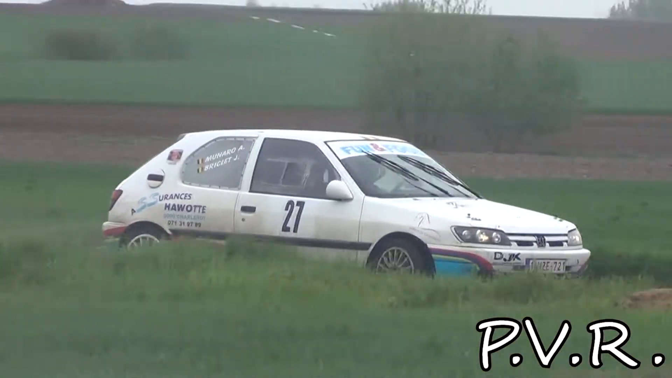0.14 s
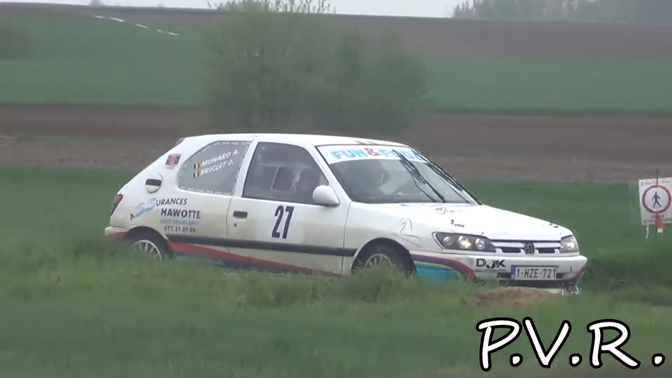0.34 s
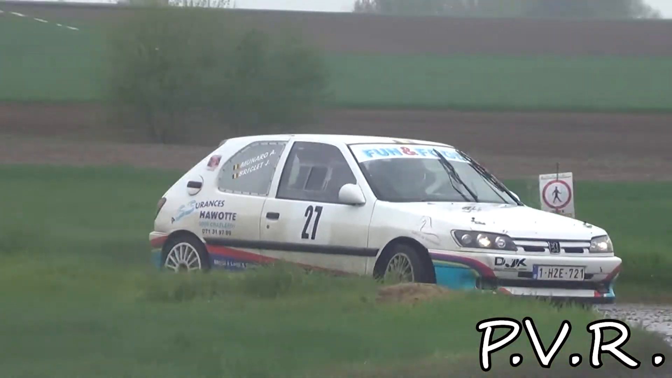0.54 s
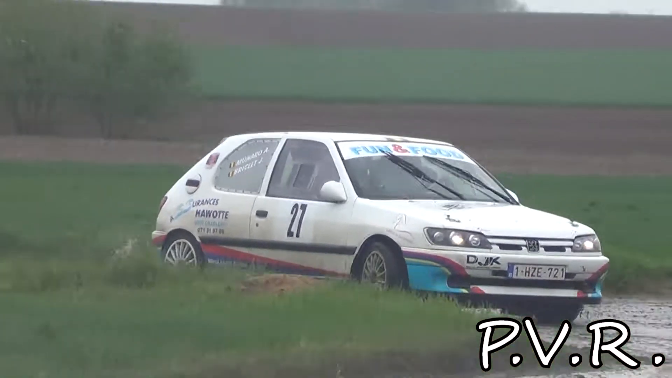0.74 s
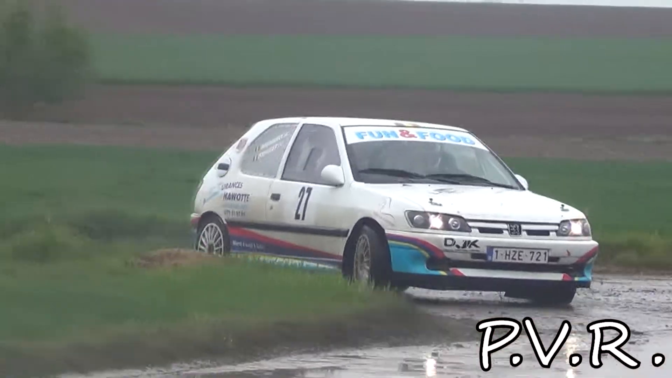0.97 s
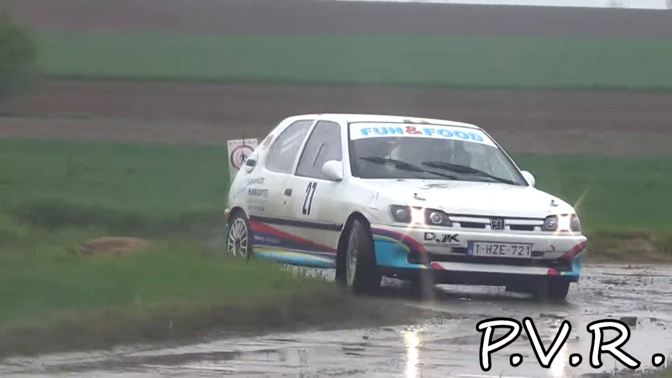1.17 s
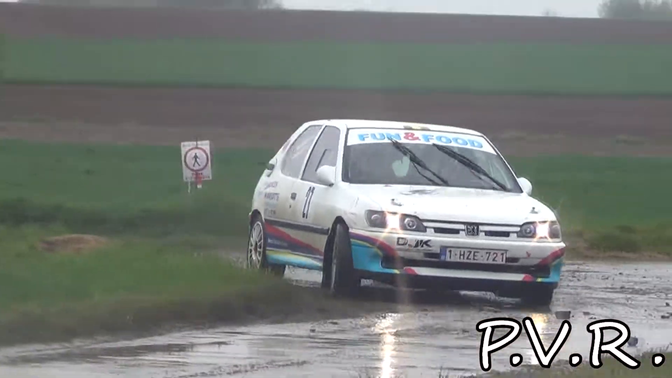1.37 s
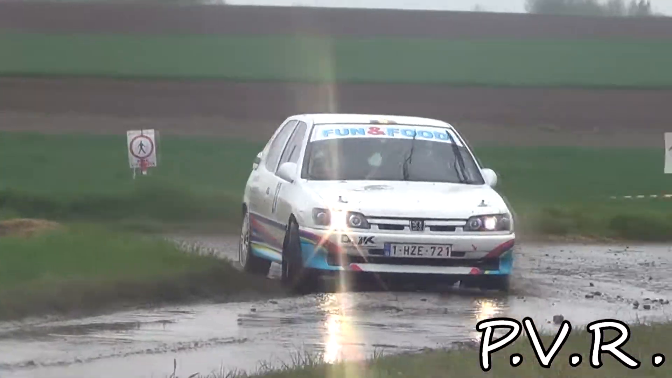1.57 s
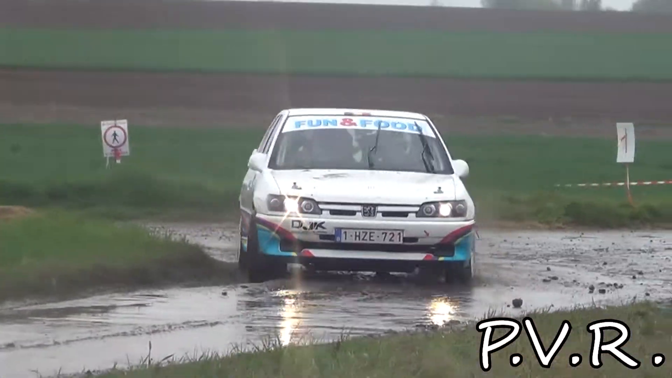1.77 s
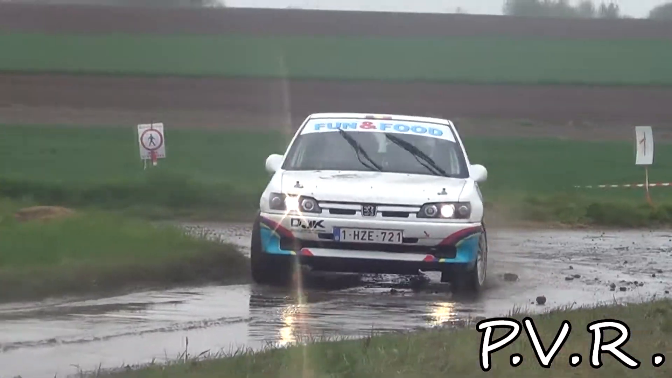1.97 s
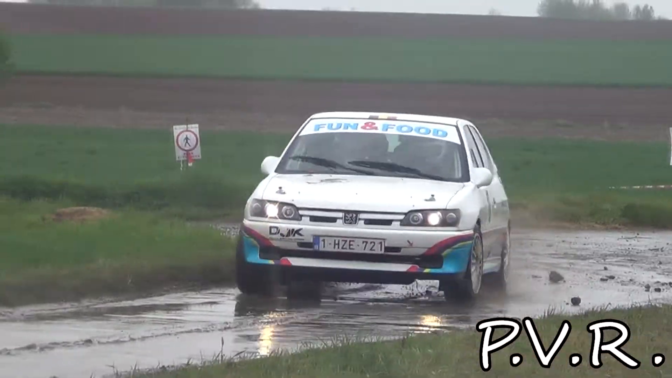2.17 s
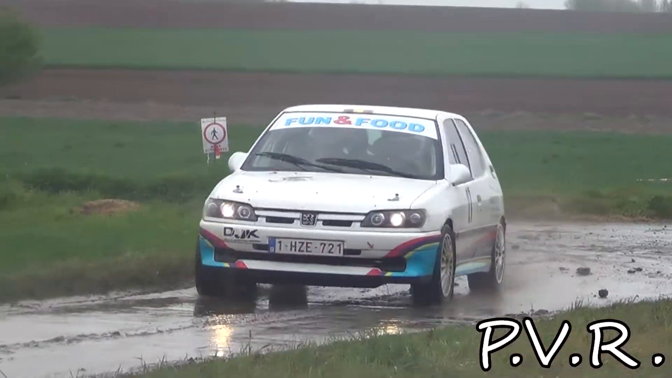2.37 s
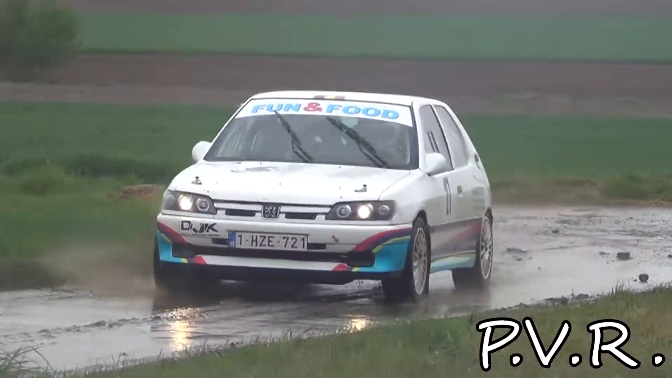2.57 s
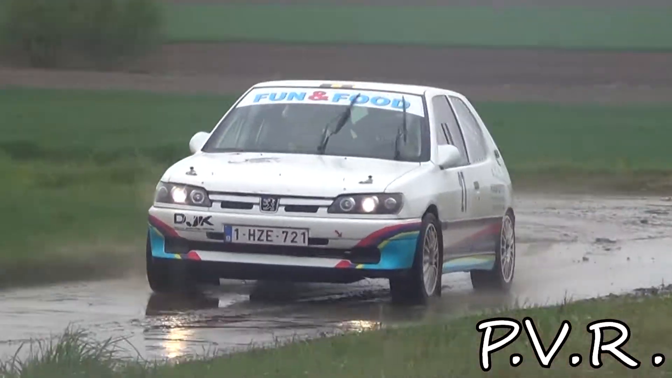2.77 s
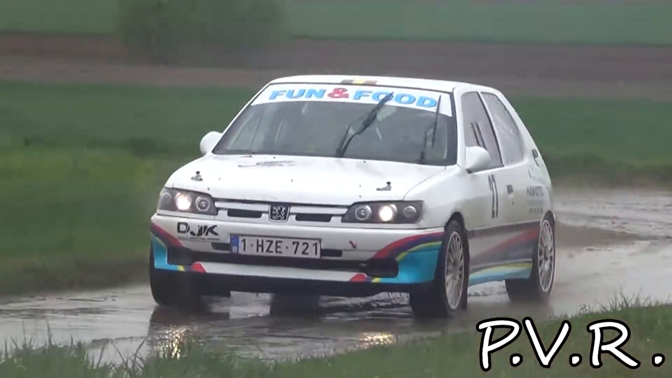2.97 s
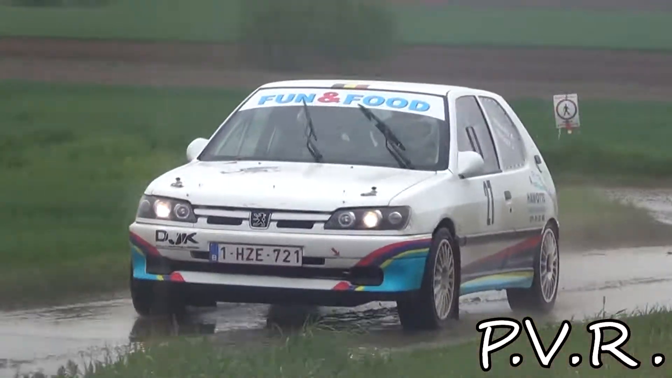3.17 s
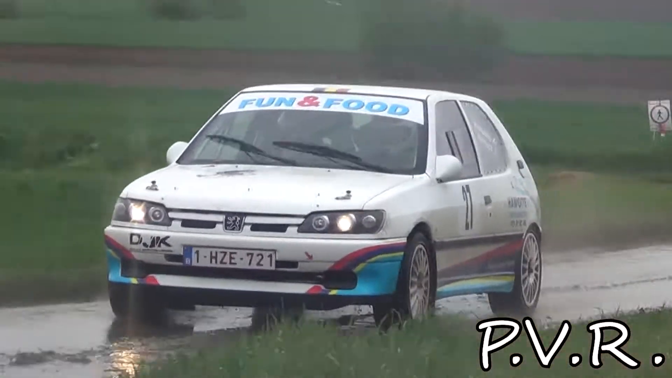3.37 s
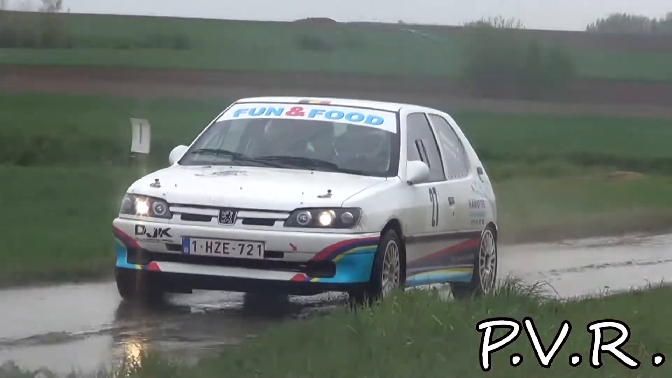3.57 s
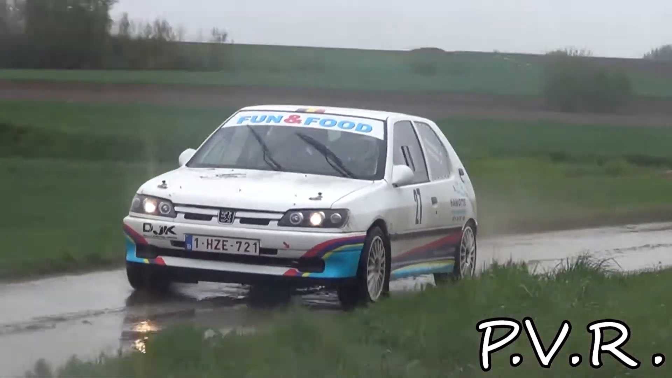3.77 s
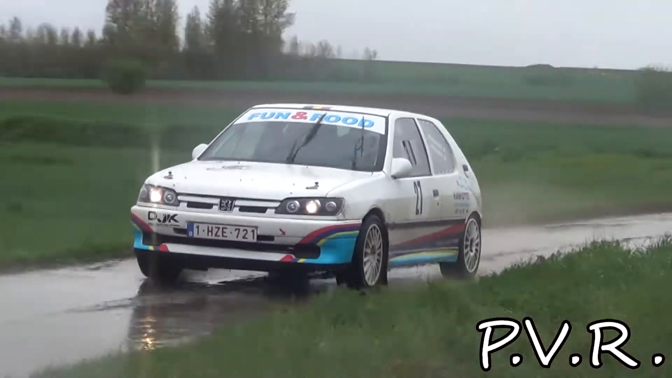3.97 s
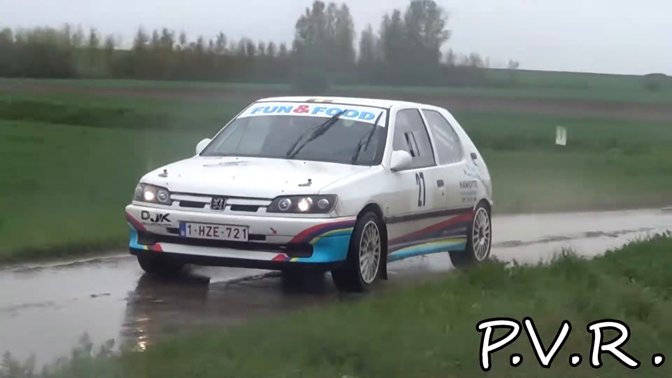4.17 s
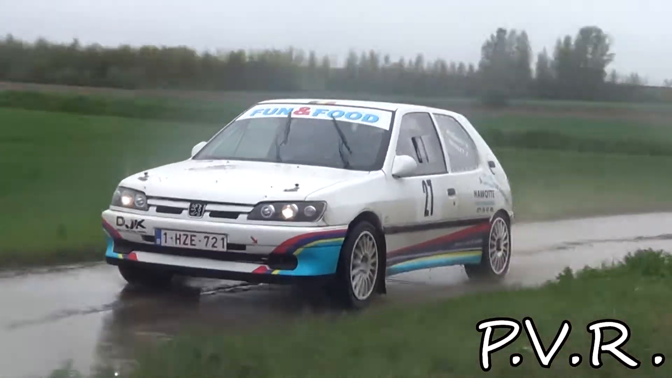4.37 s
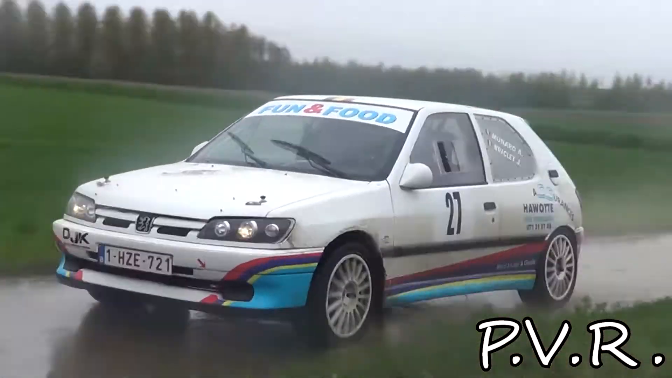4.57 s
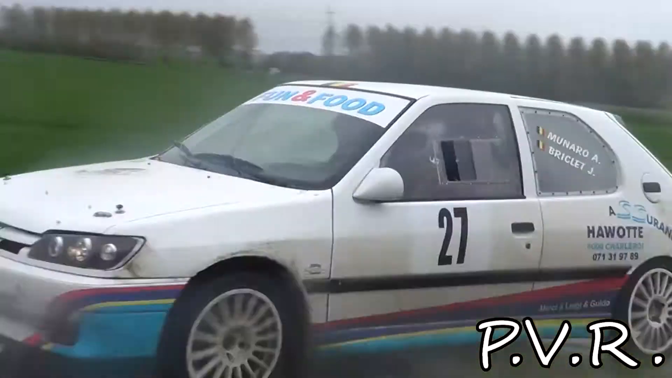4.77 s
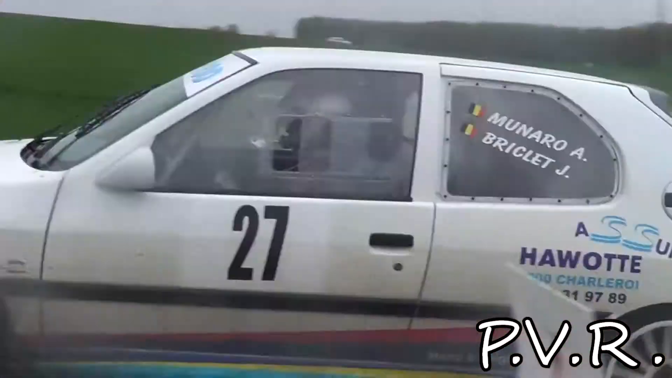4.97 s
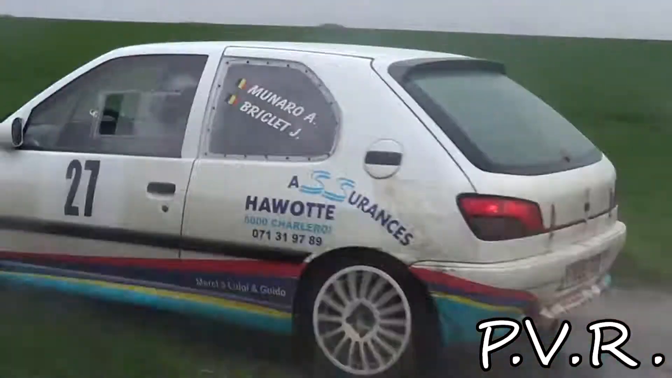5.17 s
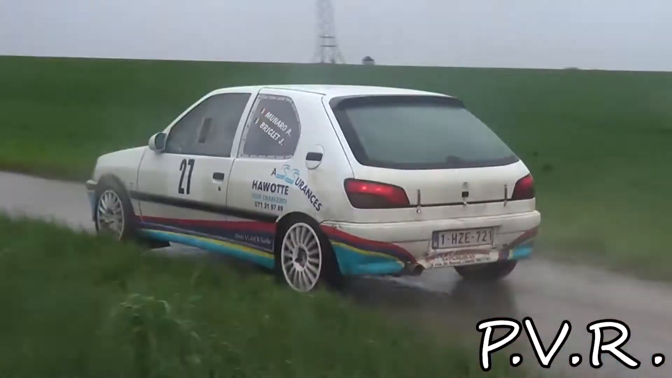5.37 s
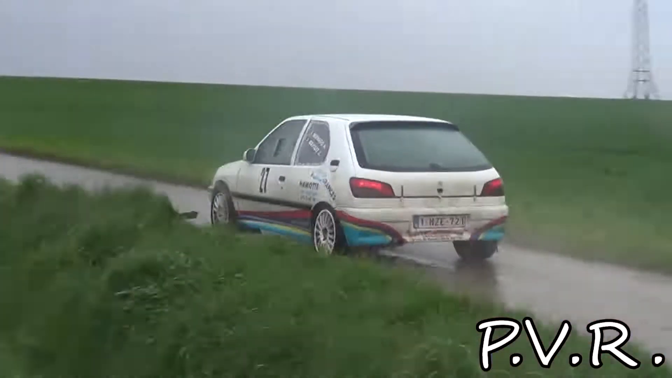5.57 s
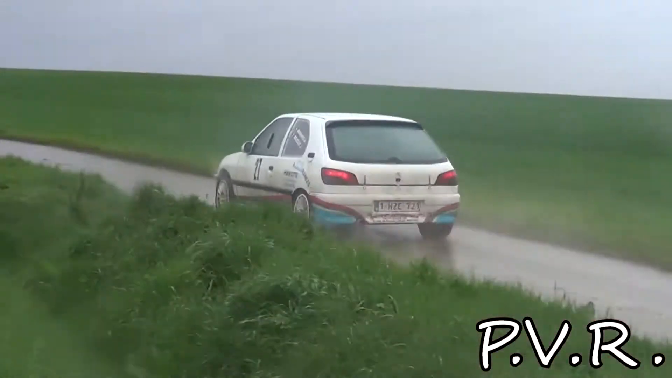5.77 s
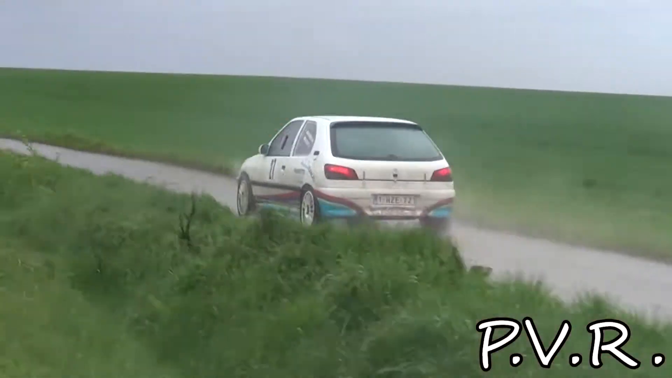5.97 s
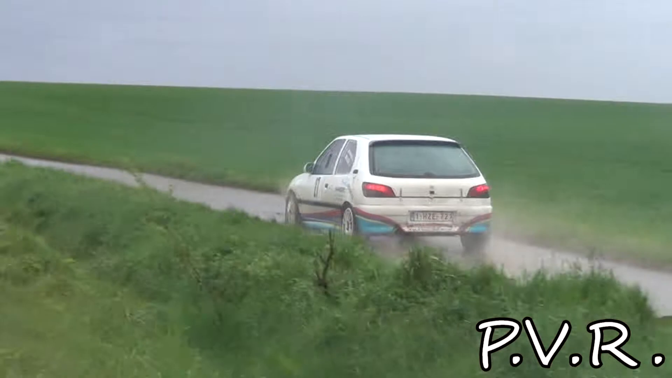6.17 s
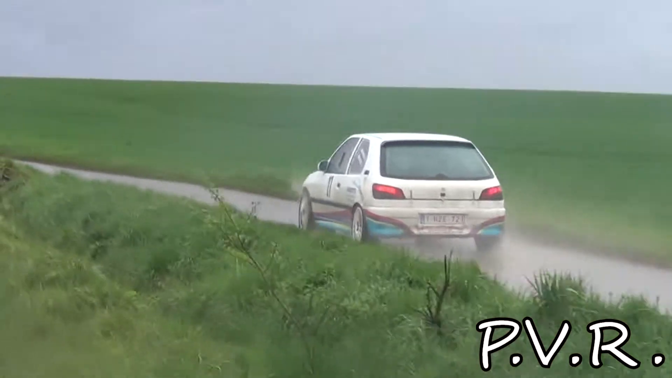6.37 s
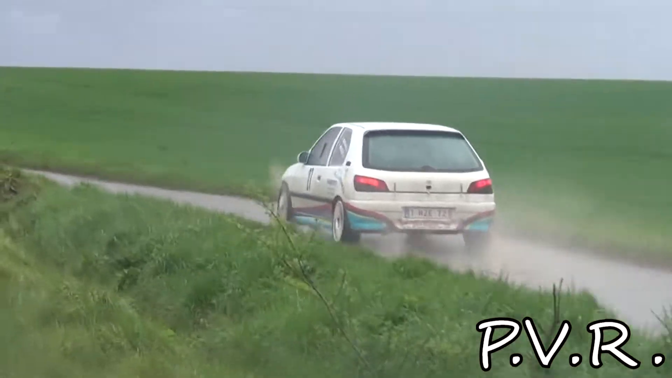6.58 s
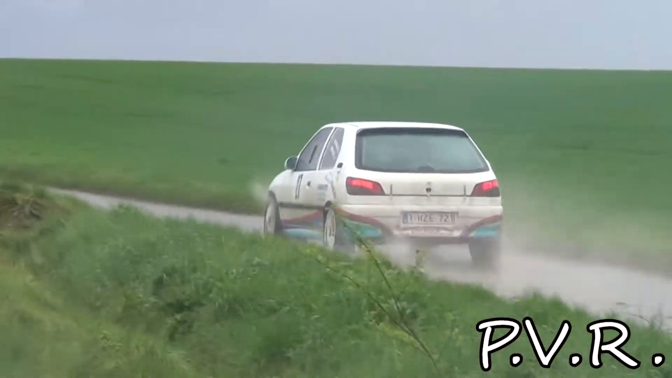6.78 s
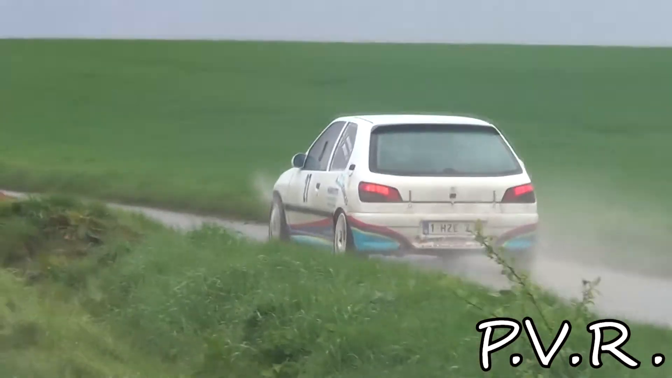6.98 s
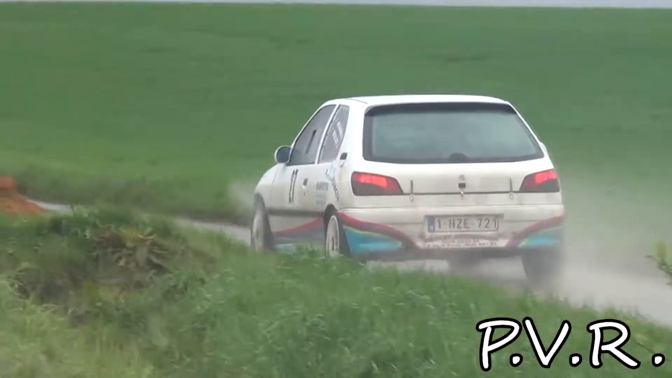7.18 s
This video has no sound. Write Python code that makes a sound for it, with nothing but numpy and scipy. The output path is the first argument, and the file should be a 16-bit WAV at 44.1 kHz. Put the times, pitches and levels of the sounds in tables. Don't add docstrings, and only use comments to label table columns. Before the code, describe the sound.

A four-cylinder rally car approaches through a wet bend in open fields, its low, rough growl mixed with stone knocks and puddle splashes. Tyres hiss and roar as the revs climb steadily. It sweeps close past, the exhaust turning harsher, then the throttle lifts with a brief rasp and backfire before a lower gear note pulls away. Close, dry outdoor stereo pickup with only faint wind.

```python
import sys
import numpy as np
from scipy import signal
from scipy.fft import rfft, irfft, next_fast_len
from scipy.io import wavfile
from scipy.ndimage import uniform_filter1d

SR = 44100
rng = np.random.default_rng(int(sys.argv[2]) if len(sys.argv) > 2 else 0)


def undo_db(level):
    steps = np.asarray(level, float) / 20
    return 10 ** steps


def dump(signal):
    limited = np.clip(np.atleast_2d(signal).T, -1, 1)
    pcm = np.round(limited * 32767).astype(np.int16)
    wavfile.write(sys.argv[1], SR, pcm)


N = 318481
T = np.arange(N) / SR
FFT_LEN = next_fast_len(N, real=True)
HZ = np.arange(FFT_LEN // 2 + 1) * SR / FFT_LEN

# (time [s], level [dB])
WIND_TONE = [(15, -4), (30, -4), (60, 0), (90, -20)]
WIND_LEVEL = [(0, -62), (2, -57), (4.5, -42), (5.7, -54), (6.3, -85), (7.22, -66)]
# (time [s], spray of slipping tyres [dB], mist of rolling tyres [dB], roar beside the spray [dB])
ROAD = [(0, -35.5, -62, -6.5), (.52, -42.5, -50, -4.5), (.84, -40, -38.5, 1), (1.35, -29, -33.5, -3),
        (2.0, -26.5, -26, 0.5), (2.1, -29, -27.5, -2), (2.99, -27.5, -25, 0.5), (3.32, -24, -26, 0),
        (4.07, -31, -23.5, 7.5), (4.13, -30.5, -22.5, 3), (4.52, -33, -27.5, 2.5), (5.04, -31, -23.5, 1),
        (5.1, -40, -29.5, 5.5), (5.4, -39, -26.5, 4.5), (5.87, -39.5, -33.5, 2.5), (6.0, -43.5, -36, -1.5),
        (6.35, -46, -41, 2.5), (7.22, -49, -46.5, 5.5)]
# (frequency [Hz], level [dB])
SPRAY_TONE = [(1500, -35), (2150, -5.5), (2800, -2), (4000, -4.5), (6000, -3), (8000, -7.5), (10500, -16),
              (15700, -37)]
MIST_TONE = [(4000, -25), (7000, -3.5), (8500, 0.5), (10500, -2.5), (12500, -13.5), (16500, -16.5)]
ROAR_TONE = [(30, -27), (70, -23), (150, 5.5), (400, -2), (900, 0), (1600, 2), (2150, 3), (3200, -29)]
# (time [s], length [s], mist boost [dB])
SHEETS = [(3.42, 0.11, 5), (4.72, .03, 5.5), (4.935, 0.027, 5.5), (5.047, .015, 0)]
# (time [s], peak level [dB])
SPLASHES = [(0.349, -28), (0.4989, -30), (0.905, -27), (1.165, -14.5), (1.2286, -12.5), (1.381, -21),
            (1.57, -11.5), (2.365, -11.5), (2.6817, -16), (4.073, -14), (4.118, -16), (4.9194, -18),
            (5.0294, -23)]
# (time [s], level [dB], ring frequency [Hz], ring width [Hz], click share [0-1])
KNOCKS = [
    (.3728, -17, 1000, 300, .6),
    (.373, -26, 2100, 500, 0),
    (.4745, -17, 330, 130, 0),
    (6.2815, -18, 900, 500, .05),
    (6.2865, -18, 240, 80, 0),
    (6.292, -19, 1350, 300, .05),
]
# (time [s], peak level [dB])
RASP_SPITS = [(5.965, -33), (6.005, -30), (6.045, -29), (6.135, -27), (6.2, -35), (6.232, -28)]
# (frequency [Hz], level [dB])
RASP_TONE = [(3240, -48), (5500, -19), (5950, -14), (8610, 1), (9920, 2), (11300, -7), (15700, -14)]
# (time [s], firing rate [Hz], level [dB], pulse edge [dB per octave of order])
ENGINE = [(0, 99.04, -25, -11.5), (.95, 95.6, -23, -13), (1.35, 101, -21.5, -14.5),
          (1.9, 119.3, -16.5, -11.5), (2.3, 114.5, -17, -10.5), (2.5, 123.1, -16.5, -11.5),
          (3.0, 143.2, -12, -13), (3.45, 163.6, -10.5, -12.5), (3.85, 182.4, -17, -10),
          (4.3, 207.2, -17.5, -9), (4.85, 227.9, -16, -7.5), (5.1, 228.7, -18, -7),
          (5.35, 223.8, -16, -6.5), (5.87, 235.4, -14, -8), (6.22, 197.1, -21.5, -5),
          (6.35, 180.2, -13, -7.5), (6.65, 182.9, -14.5, -9), (7.22, 194, -16.5, -8)]
# (time [s], rise [Hz], length [s], order 1 [dB], upper orders [dB])
SLIPS = [(0.361, -3, 0.11, -2.5, 3.5), (0.621, 6, 0.064, -3, 3.5), (1.418, 2, 0.044, 0.5, -17),
         (1.749, 6, .04, 1, 1.5), (2.003, 14, 0.045, 1.5, -20), (2.122, 2, .04, -7, -1.5),
         (3.51, 4.5, .06, 0, 2), (3.74, 7, .055, 1, 0), (4.17, 8, .06, 0, -2), (4.43, 3.5, .06, 0, 0),
         (4.66, -2, .05, 0, 2), (4.81, 4, .04, 1, 0), (4.89, -2.5, 0.029, -4, 0),
         (4.94, 1.5, 0.029, 1, 4.5), (5.053, 2.5, 0.0314, 2.5, 4), (6.271, 5.5, 0.027, 0, 4),
         (6.726, 11.5, 0.036, 2, 3), (6.826, 18, 0.049, 7, 4), (7.23, 5.5, 0.028, 5.5, -3)]
# (time [s], added roughness [0-1], dying away [s], stumble [dB])
MISFIRES = [(.475, .4, .1, 1), (.52, 0, .01, -5), (.55, .07, 1.5, 0), (1.95, .15, .1, 0),
            (3.15, .08, .3, 0), (4.8, .05, .15, 0), (5.92, .25, .04, -11), (5.942, 0, .01, 5),
            (5.962, 0, .01, -4), (5.98, 0, .01, 3), (6.268, .8, .03, 0)]
# (order of the firing rate, level beside the lumpiness [dB])
UNEVEN = [(.5, -9), (.75, -38), (1.25, -7.5), (1.5, -0.5), (1.75, -10), (2.25, -9.5), (2.5, -17),
          (2.75, -30), (3.498, -26), (3.75, -13.5), (4.5, -25), (5.5, -15.5), (6.5, -20)]
# (firing rate [Hz], quarter orders beside the engine [dB])
LUMPY = [(100, -15), (160, -24.5), (182, -28), (215, -24)]
# (frequency [Hz], level [dB])
CRACK_TONE = [(900, 11), (2300, 0), (3100, -7.5), (4500, -7.5), (6500, -20)]
# (time [s], length [s], crack boost
# [dB])
BARKS = [(3.3, 0.23, 18), (4.02, 0.079, 17), (5.05, .045, 14), (5.158, 0.067, 10), (5.334, 0.096, 14),
         (5.65, 0.098, 4.5)]
# (offset [octaves], width [octaves], level [dB])
NOTCH = [(0, 0.11, -7), (.35, 0.098, -1)]
# (frequency [Hz], width [Hz], level [dB])
AHEAD = [(159.7, 10.5, -17), (204, 22, 5), (240.4, 15.6, 8.5), (295, 5.6, 0), (307, 12, 2.5), (392, 11, 4),
         (416, 49, -1), (636, 39, -6.5), (790, 38, 5.5), (890, 99, 5), (1010, 27, 5), (1134, 40, 6.5),
         (1226, 50.2, -20)]
BEHIND = [(188, 4.5, -9.5), (199.4, 5.2, 4.5), (220, 3.7, -8), (461.9, 30, -0.5), (569, 28, -9.5),
          (650, 67, 5), (751.2, 52, 7.5), (1130, 14, 1), (1182, 28, -6.5), (1318.3, 80, 3), (1614, 67, -2)]
# (frequency [Hz], width [Hz], level [dB])
BANK = [(700, 150, -16)]
# (frequency [Hz], width [Hz], level [dB])
INTAKE = [(691, 33, -24), (800, 30, -24), (920, 18, -20), (1077, 70, -23), (1200, 42, -27), (1378, 50, -31)]
# (frequency [Hz], width [Hz], level [dB], phase [rad])
PORTS = [(0, 1935, -4.3, -2.43), (572, 237, -7, 2.76), (1600, 600, -11.5, 3.5), (4083, 597, -4.5, 2.56),
         (5246, 883, -6, 1.46), (6632, 689, -13, .2), (9049, 873, -8.5, -.16), (9387, 735, -9, .9)]

PASS_S, TURN_S = 5.03, 0.11
BANK_S = 0.79
LIFT_S, CLUTCH_S, PEDAL_S = 5.905, 6.27, 0.0098
COAST_S = 0.065
LIFT_DB, COAST_DB, COAST_EDGE_DB = -11, -0.5, -3
LUMPY_LIFT_DB, MISFIRE_LUMP_DB = -1, 28
SMOOTH_ROUGH, STUMBLE_S = .045, .008
CRACK_DB, REAR_CRACK_DB = -11, 1.5
NOTCH_HZ, NOTCH_OCTAVES_S, AIM_S = 3521, 1.3, 5.27
BEAT_HZ, BEAT_DB, BEAT_S = 9.5, 4.5, 0.21
INTAKE_TUNED_HZ, INTAKE_RANGE_HZ = 173.6, 14.3
RASP_FLOOR_DB, RASP_FALL_DB_S, RASP_END_S = -40, 800, 6.245
HOUSING_ECHO_HZ, HOUSING_ECHO = 1150, .25
ECHO_FROM_HZ = 1260


def curves(table):
    s, *columns = np.transpose(table)
    return [np.interp(T, s, c) for c in columns]


def bumps(x, table):
    return sum(height * np.exp(-((x - centre) / width) ** 2) for centre, width, height in table)


def step(s, length_s):
    return .5 + .5 * np.tanh((T - s) / length_s)


def walk(rate, count=6):
    held = np.repeat(rng.standard_normal(int(N / SR * rate) + 2), count)
    slewed = uniform_filter1d(uniform_filter1d(held, count), count)
    return 1.9 * np.interp(T * rate * count, np.arange(len(held)), slewed)


def filtered(x, response):
    return irfft(rfft(x, FFT_LEN) * response, FFT_LEN)[:N]


def colour(x, points):
    hz, db = np.transpose(points)
    y = filtered(x, undo_db(np.interp(np.log(HZ + 1), np.log(hz), db, -90, -90)))
    return y / np.std(y)


def wind():
    shared = colour(rng.standard_normal(N), WIND_TONE)
    own = colour(rng.standard_normal(N), WIND_TONE)
    ports = np.array([0.52 * shared + .35 * own, 0.61 * shared - .35 * own])
    return ports * undo_db(curves(WIND_LEVEL)[0] + 1.8 * walk(4.9))


def patchy(points, turns, pulse, swell, own_db, grain_db):
    spectrum = 0
    low, high = points[0][0], points[-1][0]
    for hz in low * 2 ** np.arange(0, np.log2(high / low) + .5, .8):
        drops = rng.standard_normal(N) * undo_db(grain_db * walk(500) + own_db * walk(13) + swell)
        band = np.exp(-(np.log2((HZ + 1) / hz) / .5) ** 2)
        spectrum = spectrum + rfft(drops, FFT_LEN) * band
    pulsing = 1 + pulse * np.cos(2 * np.pi * turns)
    return colour(irfft(spectrum, FFT_LEN)[:N] * pulsing, points)


def tyres(turns):
    spray_db, mist_db, roar_db = curves(ROAD)
    mist_db = mist_db + bumps(T, SHEETS)
    swell = 0.86 * walk(9) + 0.46 * walk(30)
    spray = patchy(SPRAY_TONE, turns, pulse=0.032, swell=swell, own_db=0.14, grain_db=1.5)
    mist = patchy(MIST_TONE, turns, pulse=0.21, swell=swell, own_db=-0.1, grain_db=1.0)
    roar = patchy(ROAR_TONE, turns, pulse=0.05, swell=swell, own_db=0.55, grain_db=0.5)
    return undo_db(spray_db) * (spray + undo_db(roar_db) * roar) + undo_db(mist_db - 5.5) * mist


def splashes(length_s=0.0073, rise_s=.005):
    shape = 0
    for s, db in SPLASHES:
        rise = np.clip((T - s) / rise_s, 0, 1)
        shape = shape + undo_db(db) * rise * np.exp(-np.clip(T - s, 0, 1) / length_s)
    return undo_db(-5.0) * shape * colour(rng.standard_normal(N), SPRAY_TONE)


def knocks():
    out = np.zeros(N)
    t = T[:2000]
    for s, db, hz, width_hz, click_share in KNOCKS:
        ring = np.exp(-np.pi * width_hz * t) * np.sin(2 * np.pi * hz * t)
        click = np.exp(-t / 0.0013) * rng.standard_normal(len(t))
        out[int(s * SR):][:len(t)] += undo_db(db) * (ring + click_share * click)
    return out


def rasp(turns, width=0.15):
    peaks = [peak_db - RASP_FALL_DB_S * np.abs(T - s) for s, peak_db in RASP_SPITS]
    db = np.max(peaks + [RASP_FLOOR_DB + 0 * T], axis=0)
    coasting = step(RASP_SPITS[0][0], PEDAL_S) - step(RASP_END_S, .003)
    spit = np.exp(-(turns % 1) / width) * rng.standard_normal(N) * undo_db(1.9 * walk(59.75))
    return colour(spit, RASP_TONE) * undo_db(db) * coasting


def firings(hz, rough, jitter=0.18, scatter_db=2.5):
    turns = np.cumsum(hz) / SR
    chance = rng.standard_normal((2000, 2))
    index = np.arange(len(chance))
    late = np.interp(turns, index, chance[:, 0]) * jitter * rough
    strength = undo_db(np.interp(turns, index, chance[:, 1]) * scatter_db * rough)
    return turns + late, strength


def orders(turns, bend, line_db, first, flutter_db=.9, shimmer=.18):
    out = 0
    for k, db in enumerate(line_db, first):
        level = np.sqrt(2) * undo_db(db + flutter_db * walk(25))
        out = out + level * np.cos(2 * np.pi * k * turns + bend * np.sqrt(k) + shimmer * walk(18))
    return out


def uneven(turns, level_db, wander_db=1.5):
    out = 0
    for k, db in UNEVEN:
        level = np.sqrt(2) * undo_db(level_db + db + wander_db * walk(9))
        out = out + level * np.cos(2 * np.pi * k * turns + 0.96 * walk(7))
    return out


def crack(hz, level_db, count=27):
    pipe_hz, pipe_db = np.transpose(CRACK_TONE)
    notch_hz = NOTCH_HZ * 2 ** (NOTCH_OCTAVES_S * (T - AIM_S))
    passed = step(PASS_S, PEDAL_S)
    lines = []
    for k in range(8, count):
        pipe = np.interp(np.log(k * hz), np.log(pipe_hz), pipe_db)
        lines.append(level_db + pipe + passed * bumps(np.log2(k * hz / notch_hz), NOTCH))
    return lines


def exhaust(hz, level_db, edge_db, count=8):
    behind = step(PASS_S, TURN_S)
    beat = -np.cos(2 * np.pi * BEAT_HZ * (T - PASS_S)) - .5
    beat_db = BEAT_DB * np.exp(-((T - PASS_S) / BEAT_S) ** 4) * beat
    first_slip_db, upper_slip_db = [bumps(T, np.array(SLIPS)[:, [0, 2, c]]) for c in (3, 4)]
    tuned = (1 - behind) * np.exp(-((hz - INTAKE_TUNED_HZ) / INTAKE_RANGE_HZ) ** 2)
    howl = [(f, w, undo_db(db)) for f, w, db in INTAKE]
    lines = []
    for k in range(1, count):
        db = level_db + edge_db * np.log2(k)
        db += (1 - behind) * bumps(k * hz, AHEAD) + behind * bumps(k * hz, BEHIND)
        db += (1 - step(BANK_S, .2)) * bumps(k * hz, BANK)
        db += upper_slip_db if k > 1 else first_slip_db + beat_db
        lines.append(20 * np.log10(np.hypot(undo_db(db), tuned * bumps(k * hz, howl))))
    return lines


def engine(hz, level_db, edge_db, rough, turns, strength):
    lifted = step(LIFT_S, PEDAL_S)
    coasting = step(LIFT_S + COAST_S, COAST_S) - step(CLUTCH_S, PEDAL_S)
    lumpy_db = level_db + np.interp(hz, *np.transpose(LUMPY)) + LUMPY_LIFT_DB * lifted
    lumpy_db = lumpy_db + MISFIRE_LUMP_DB * np.clip(rough - SMOOTH_ROUGH, 0, .3)
    level_db = level_db + LIFT_DB * lifted + COAST_DB * coasting
    edge_db = edge_db + COAST_EDGE_DB * coasting
    crack_db = level_db + np.log2(8) * edge_db + CRACK_DB
    crack_db = crack_db + REAR_CRACK_DB * step(PASS_S, PEDAL_S) + bumps(T, BARKS)
    stumble_db = bumps(T, [(s, STUMBLE_S, db) for s, _, _, db in MISFIRES])
    bend = -.9 + .35 * walk(1.5)
    low = undo_db(stumble_db) * strength * orders(turns, bend, exhaust(hz, level_db, edge_db), first=1)
    high = strength * orders(turns, bend, crack(hz, crack_db), first=8, shimmer=.12)
    return low + uneven(turns, lumpy_db) + high


def housing_echo(x):
    echo = HOUSING_ECHO / (1 + (ECHO_FROM_HZ / (HZ + 1)) ** 4)
    return filtered(x, 1 / (1 - echo * np.exp(-2j * np.pi * HZ / HOUSING_ECHO_HZ)))


def scene():
    hz, level_db, edge_db = curves(ENGINE)
    hz = hz + bumps(T, np.array(SLIPS)[:, [0, 2, 1]])
    rough = SMOOTH_ROUGH
    for s, more, length, _ in MISFIRES:
        rough = rough + more * (T > s) * np.exp(-np.abs(T - s) / length)
    turns, strength = firings(hz, rough)
    noises = tyres(turns) + splashes() + knocks() + rasp(turns)
    car = housing_echo(noises) + engine(hz, level_db, edge_db, rough, turns, strength)
    return np.tile(car, (2, 1))


def low_pass(x):
    return signal.sosfilt(signal.butter(12, 15890, fs=SR, output="sos"), x)


def record(dry):
    low_cut = signal.butter(4, 70, "high", fs=SR, output="sos")
    mid = signal.sosfilt(low_cut, filtered(dry[0], HZ < 15850))
    modes = 0
    for hz, width_hz, db, rad in PORTS:
        modes = modes + undo_db(db) * np.exp(1j * rad) / (1 + 2j * (HZ - hz) / width_hz) ** 2
    side = filtered(mid, modes / (1 + (HZ / 11700) ** 20))
    ports = np.array([mid + side, mid - side]) + wind()
    rounded = np.tanh(.9 * ports) / .9
    return low_pass(rounded)


dry = scene()
out = record(dry)
dump(out)
```